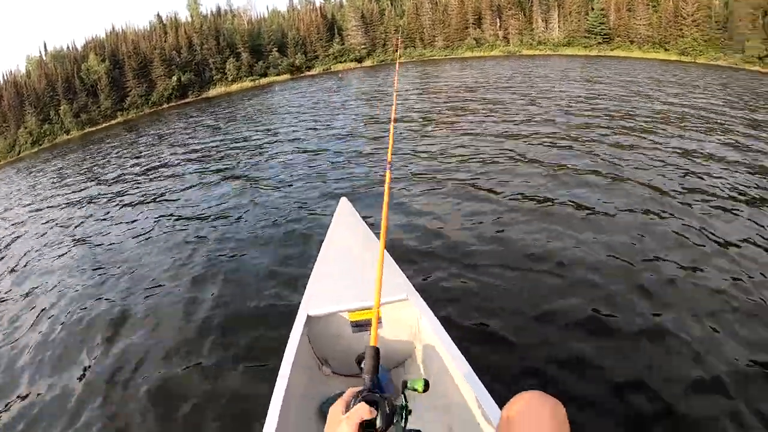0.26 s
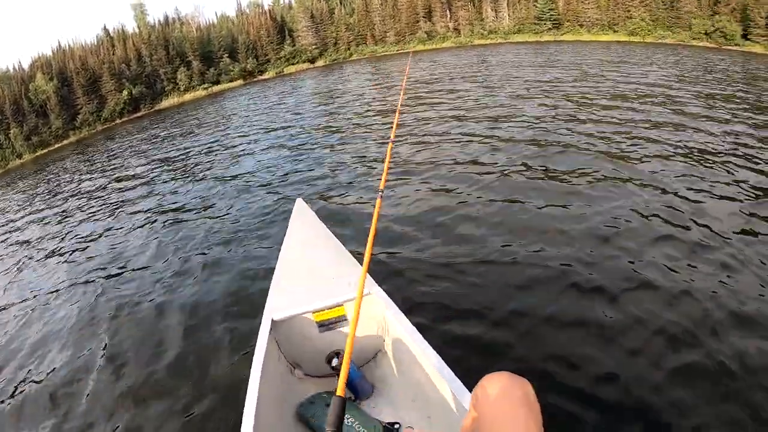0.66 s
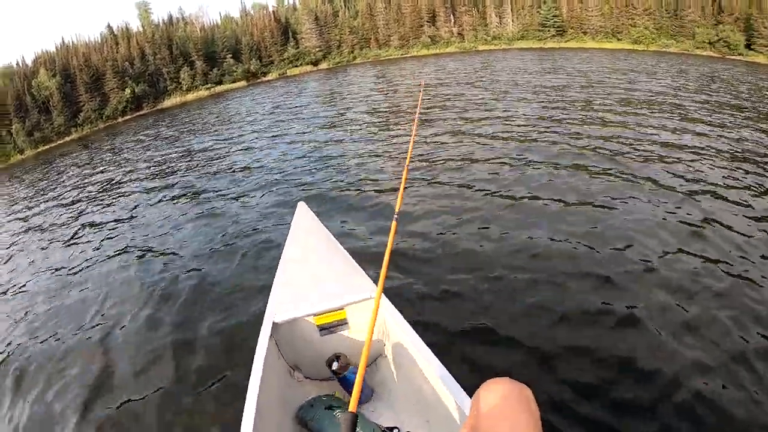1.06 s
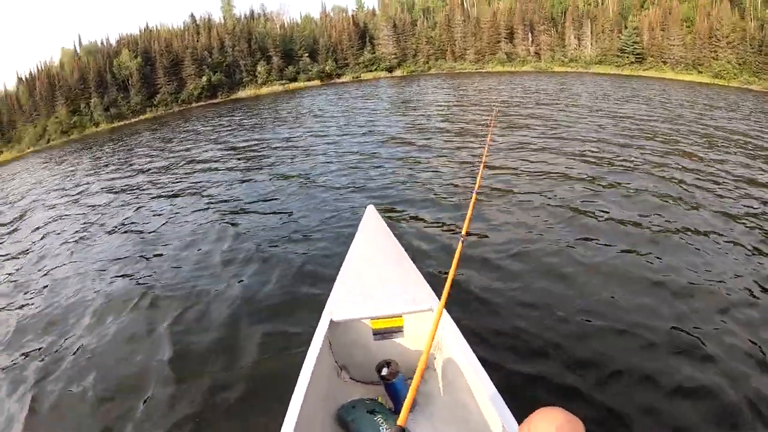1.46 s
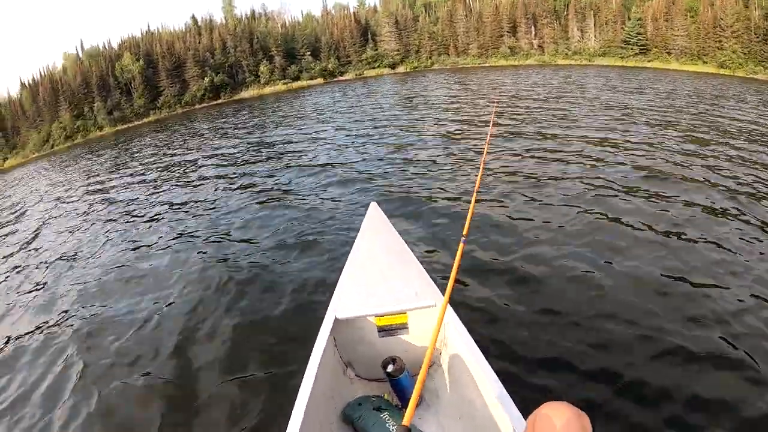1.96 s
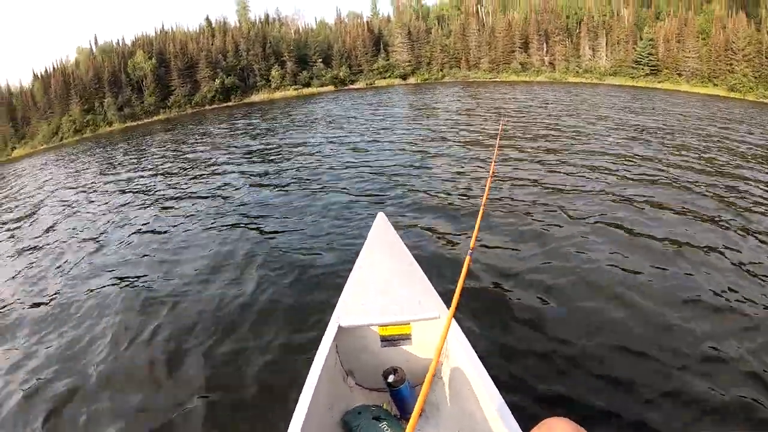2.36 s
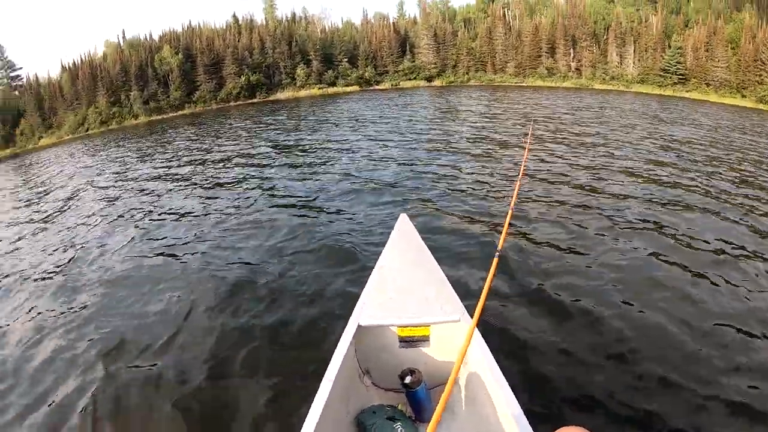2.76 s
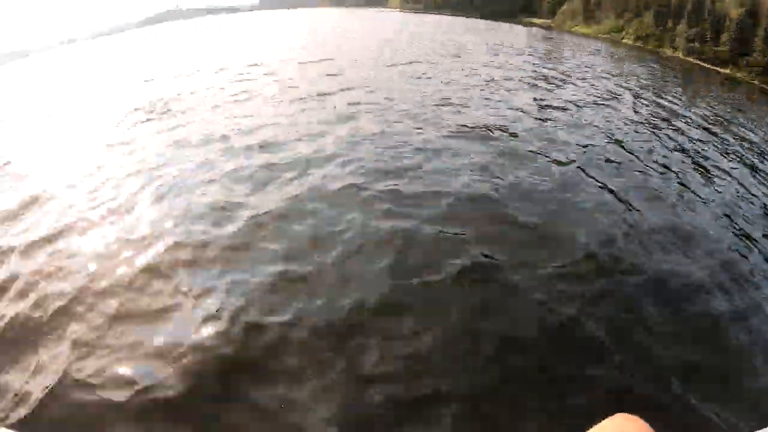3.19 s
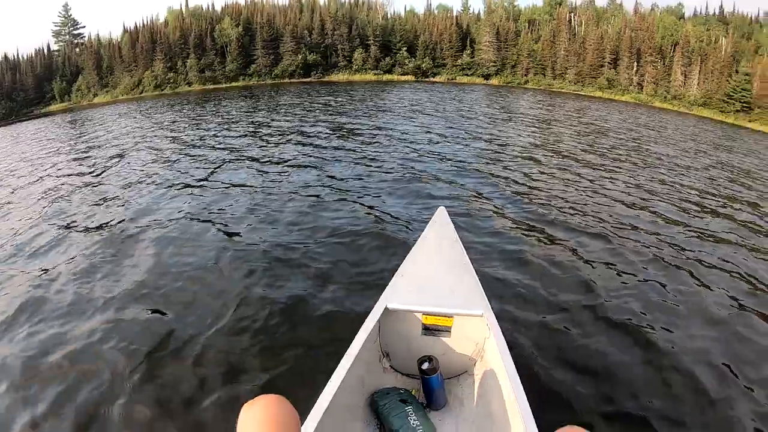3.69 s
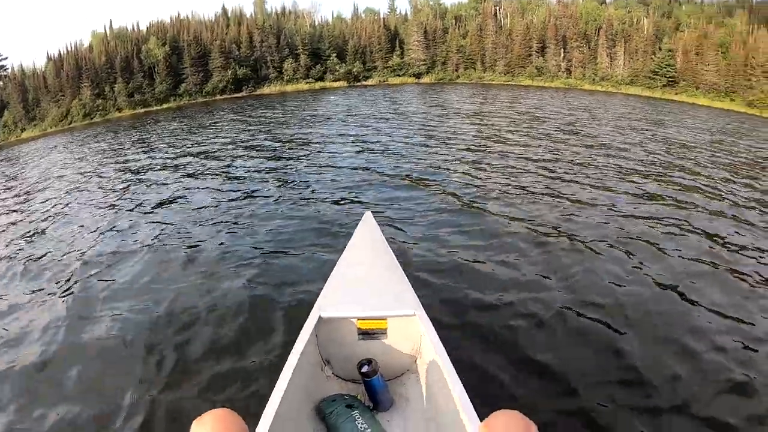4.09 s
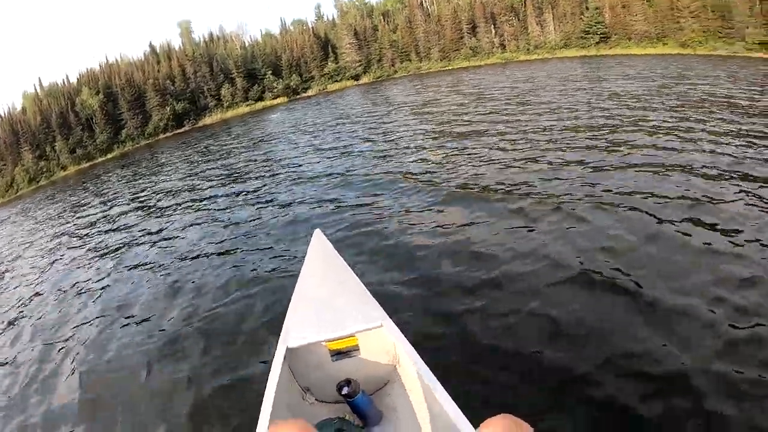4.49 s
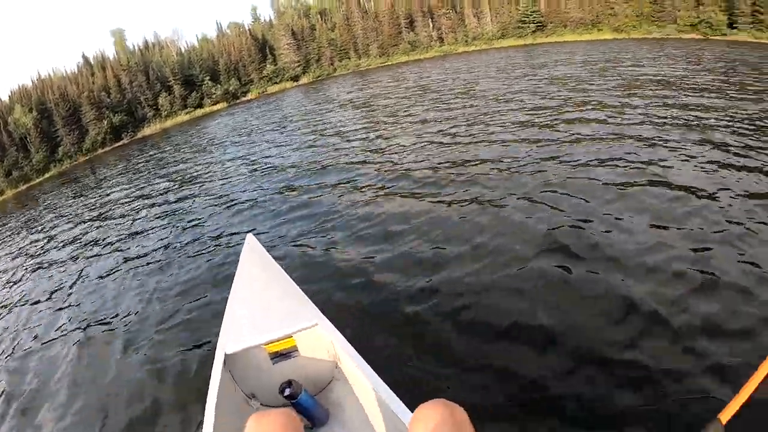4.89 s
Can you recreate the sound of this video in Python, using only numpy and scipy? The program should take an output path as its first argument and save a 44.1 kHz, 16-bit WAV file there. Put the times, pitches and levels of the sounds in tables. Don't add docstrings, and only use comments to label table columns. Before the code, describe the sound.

Wind rumbles and flutters softly on a small stereo camera microphone while wavelets lap a canoe, with tiny high drips and bubbles and light ticks of gear. At about 0.77 s a reel clutch snaps in, a bright, dry, very short metallic clack, by far the sharpest sound so far. Quiet lapping follows; near 1.5 s a small bird faintly sings a quick falling phrase on the left, and a crisp drop hits at 1.7. Around 2.6 s ticks and snaps lead into sloshing, deep gulps and plops on the left until about 3.1. A stronger gust pushes at 3.1; scuffs and a hard, short hull knock come at 3.4-3.5. From about 4 s a reel rattles grainily on the right, with a small rising squeak near 4.3 and short gear whines at 4.4, 4.7, 4.9 and 5.15. The bird repeats faintly near 4.75, and light knocks end it.

```python
import sys
import numpy as np
from scipy import signal
from scipy.fft import rfft, irfft
from scipy.io import wavfile
from scipy.ndimage import uniform_filter1d, map_coordinates

SR = 44100
rng = np.random.default_rng(int(sys.argv[2]) if len(sys.argv) > 2 else 0)


def transcribe(u):
    v = np.clip(np.atleast_2d(u).T, -1, 1)
    q = np.round(v * 32767).astype(np.int16)
    wavfile.write(sys.argv[1], SR, q)


def boost_factor(decibels):
    exponent = np.asarray(decibels, float) / 20
    return 10 ** exponent


N = 226798
T = np.arange(N) / SR
SIDES = np.array([[.5], [-.5]])

# [t/s, peak level/dB, share of low ring 0-1, build-up/s]
CLUTCH = [
    (.735, -33, 0.15, 0.0052),
    (.751, -25, 0.47, 0.004),
    (0.745, -21.5, 0.2, 0.0022),
    (0.7688, -16, 0.73, 0.0024),
    (0.772, -1.5, 0.17, 0.0019),
    (0.784, -17, 0.42, 0.00081),
    (0.791, -26.5, 0.6, 0.0043),
    (.797, -29, 0.5, 0.0045),
]
# [f/Hz, level/dB, time to fall 60 dB/s]
CLUTCH_LOW = [(600, -2.5, 0.014), (810, -5, .02), (1080, 1, 0.011), (1500, 8, 0.011), (1820, 2, 0.017),
              (2550, -9, 0.028)]
# [f/Hz, level/dB, time to fall 60 dB/s]
CLUTCH_HIGH = [(2600, -2, .009), (3085, 0, .011), (3630, 1, .01), (4500, -1, .008), (5400, 1, .008),
               (6290, -3, .007), (7000, -8, .007)]
# [start t/s, end t/s, fastest t/s, teeth per s, level/dB, slowing/(teeth per s) per s]
TURNS = [
    (3.72, 3.78, 3.747, 332, -47, 1900),
    (4.375, 4.49, 4.415, 422, -35.5, 2300),
    (4.65, 4.735, 4.683, 428, -33.5, 1700),
    (4.885, 4.985, 4.93, 410, -36, 3200),
    (5.11, 5.2, 5.16, 400, -40, 1900),
]
# [t/s, level/dB, time to fall 20 dB/s (negative: time to rise 20 dB/s, then a slow
PUSHES = [
    (4.19, -46.5, 1.7),
    (4.29, -40.5, -0.24),
    (4.44, -34, 0.03),
    (4.6, -37.5, -0.11),
    (4.7, -35.5, 0.03),
    (4.84, -42.5, -0.1),
    (4.94, -36.5, 0.04),
    (5.07, -42.5, 0.15),
]
# [f/Hz, level/dB]
HOUSING = [(600, -6.5), (1000, 2), (1400, 4), (1800, 5), (2300, 4.5), (2750, -4.5), (3400, -9), (5000, -18),
           (7000, -52)]
# [f/Hz, level/dB]
TOOTH = [(1000, -38), (1300, 0.5), (1650, 7), (2100, 1.5), (2550, -5.5), (2900, -42), (4000, -44)]
# [t/s, level/dB, time to fall 20 dB/s, spray level/dB, left-right level/dB]
SLOSH = [(2.4, -71, 0.06, 28.5, 8), (2.59, -49.5, 0.06, 18, 12), (2.705, -33.5, 0.0154, 3.5, 9),
         (2.765, -40.5, 0.1835, 5.5, 6.5), (2.89, -38, 0.08, 3, 5.5), (2.936, -37, 0.09, 1.5, 4),
         (3.03, -42, 0.23, 1.5, 8), (3.42, -47, 0.2, 2.5, -6.5), (3.48, -46.5, 0.19, -0.5, -3),
         (3.535, -45, 0.22, -2.5, -5.5), (3.745, -47, 0.14, 5, -20), (3.62, -50.5, 0.07, 11, -19),
         (3.83, -51.5, 0.3, -3.5, -14), (3.92, -54.5, 0.08, 6, -19)]
# [f/Hz, level per Hz/dB]
SLOSH_BODY = [(500, -109), (900, 5.5), (1900, 3.5), (3500, -4.5), (5000, -17.5), (7000, -65)]
# [f/Hz, level per Hz/dB]
BOOM = [(70, -45), (125, -11), (200, 5.5), (500, 4), (850, 5), (1300, -22)]
# [f/Hz, level per Hz/dB]
SPRAY = [(3500, -6.5), (5200, 5.5), (7000, -5), (9000, 6.5), (10600, 7.5), (12000, 5), (15500, -1),
         (16500, -69)]
# [f/Hz, level per Hz/dB]
FIZZ = [(3500, -5), (5200, 10.5), (7000, -7), (9000, 8), (10600, -9.5), (11600, -19), (15500, 3),
        (16500, -69)]
# [t/s, pitch f/Hz, level/dB]
GURGLE = [
    (2.64, 676, -42.5),
    (2.7, 960, -61),
    (2.8, 600, -44.5),
    (2.83, 493, -46),
    (2.87, 500, -55),
    (2.93, 950, -60),
    (2.97, 600, -48.5),
    (3.01, 360, -46),
    (3.07, 330, -74),
]
# [t/s, peak level/dB, ring f/Hz, left-right level/dB]
TICKS = [(0.068, -39.5, 2580, -1), (0.214, -40, 2170, -7), (0.281, -38, 2220, 12), (0.451, -37, 1420, -3),
         (0.458, -38.5, 3850, 1), (0.651, -43.5, 1570, -5), (0.717, -40, 9500, -6), (1.831, -43.5, 8800, 6),
         (1.9, -50, 4360, -3), (2.347, -43, 3400, -3), (2.358, -44, 8900, 24), (2.39, -43.5, 4430, -3),
         (2.43, -43.5, 4450, -6.5), (2.566, -41, 1870, -1.5), (2.583, -29, 4100, 1), (2.6, -27, 4220, -2),
         (2.638, -41, 4500, -5), (2.706, -22, 1770, -1), (3.194, -37, 2830, -3.5), (3.39, -27, 1970, -6.5),
         (3.44, -37, 5190, -29), (4.356, -37, 3600, 9), (2.577, -43, 9170, -6.5), (2.61, -40, 4030, 6),
         (2.755, -33, 3860, -3)]
# [t/s, peak level/dB, ring f/Hz, left-right level/dB]
DROPS = [(0.179, -38.5, 2680, 4), (0.268, -38, 3010, 0), (0.394, -35, 3130, 1.5), (0.53, -37.5, 1750, 5.5),
         (0.574, -49, 3300, -6.5), (0.669, -39.5, 3110, 4), (0.864, -41.5, 2900, 1.5),
         (1.274, -40, 2080, 1), (1.609, -39, 3180, -2), (1.683, -25, 2355, 7), (1.848, -37.5, 1920, -2),
         (1.961, -37, 2640, 1), (2.162, -39.5, 1990, -3), (2.258, -37.5, 2910, 1), (2.486, -40.5, 1800, 3),
         (3.328, -30, 894, -12), (3.41, -31.5, 2200, -5.5)]
# [t/s, peak level/dB, ring f/Hz]
PLOPS = [
    (2.9, -22, 920),
    (2.694, -21.5, 1200),
    (2.965, -27, 1100),
    (2.794, -23.5, 810),
    (2.879, -25, 976),
    (2.92, -22.5, 950),
    (2.868, -34, 730),
    (3.149, -31.5, 1300),
]
# [t/s, peak level/dB, ring f/Hz, time to fall 60 dB/s, left-right level/dB]
KNOCKS = [(3.346, -48.5, 506, 0.12, 0), (4.31, -36.5, 214, 0.13, 2.5), (0.064, -41, 243, 0.064, -1),
          (2.707, -24, 194, 0.018, -3.2), (3.523, -12, 600, 0.016, -7), (3.533, -30, 269, 0.041, 0.1),
          (4.085, -38, 166.7, 0.27, 0), (4.141, -43.5, 214, 0.25, 0), (4.192, -49, 249, 0.18, 6),
          (5.095, -28, 580.7, 0.021, -6), (5.125, -26, 574, 0.011, -6.5)]
# [t/s, pitch f/Hz, level/dB]
SQUEAK = [
    (4.245, 600, -54),
    (4.262, 680, -52),
    (4.28, 805, -55),
    (4.335, 880, -51),
    (4.36, 905, -64),
]
# [t/s, peak level/dB,
# ring f/Hz, left-right level/dB]
DRIPS_AND_THUDS = [(.011, -42.5, 790, 1), (2.643, -36, 1700, 4), (2.664, -37, 1500, 1), (2.683, -31.5, 2570, 6),
                   (2.735, -36, 1350, 11), (2.742, -37.5, 1850, 4.5), (2.771, -24, 940, 18), (2.776, -29, 2170, 4),
                   (2.794, -28, 637, 10), (2.798, -45, 1850, -1), (2.815, -28.5, 498, 4), (2.822, -35, 1710, 3),
                   (2.842, -39, 520, 7), (2.85, -39, 1890, 2), (2.858, -35, 480, 5), (2.885, -26.5, 2180, 4),
                   (2.89, -38, 500, 4), (2.908, -45, 1610, 6), (2.926, -35, 640, 9), (2.934, -29, 1860, 3),
                   (2.946, -30.5, 2430, 9), (2.949, -26, 865, 15), (2.978, -36, 3800, 2), (2.989, -30, 2060, 9),
                   (3, -30.5, 359, 4), (3.012, -31, 374, -2), (3.005, -31, 1030, 14), (3.028, -37.5, 1880, 10),
                   (3.061, -37, 3120, 14), (3.479, -39.5, 1870, -6), (3.497, -33, 600, -9), (3.53, -28, 1180, -6),
                   (3.535, -24, 177, 0), (3.546, -30, 150, 0), (4.08, -44, 566, -9), (4.608, -35, 600, -1),
                   (4.92, -40, 522, -8), (5.124, -32.5, 191, 0), (3.15, -34, 196, 3)]
# [t/s, peak level/dB, ring f/Hz, left-right level/dB]
DRIPS = [(0.148, -54, 2780, 2.5), (0.164, -43, 3020, 7), (0.243, -51, 2740, 2), (0.287, -52, 2360, 0.0),
         (0.322, -47, 2400, 5), (0.342, -41.5, 1960, 3), (0.38, -46, 2300, 4), (0.471, -50, 1410, 5),
         (0.547, -55, 3250, 3), (0.566, -43.5, 3200, 4), (0.614, -45.5, 2620, 6), (0.661, -44, 2600, 6),
         (0.691, -43.5, 2670, 11), (0.703, -56.5, 3060, 3.0), (0.821, -44, 1960, 1.5),
         (0.854, -49, 1510, 1.5), (0.895, -58, 1450, -7), (1.017, -52, 2310, 1.5), (1.06, -49, 1350, 2.5),
         (1.073, -51, 1950, -8.5), (1.163, -53, 1900, 0), (1.199, -49, 1770, -0.5), (1.226, -40.5, 2210, 6),
         (1.289, -45.5, 2280, 2), (1.296, -51, 1510, 7), (1.336, -59, 1480, -9.5), (1.415, -47, 2100, 0),
         (1.455, -47, 1850, -6), (1.482, -48, 1340, 5), (1.496, -47.5, 1400, -3), (1.798, -46, 2600, 6.5),
         (1.814, -47, 1520, -4), (1.919, -46, 3600, 1.5), (1.982, -50, 1880, -2), (2.013, -57, 2180, 2.5),
         (2.046, -53, 2070, -1.0), (2.089, -51, 1770, 3), (2.129, -50, 1520, 0.5), (2.189, -45, 2950, 2.5),
         (2.244, -48, 2780, 3), (2.286, -49, 2600, -1), (2.319, -49, 2120, 3), (2.429, -45, 4500, -1),
         (2.503, -43, 2610, 5)]
# [t/s, peak level/dB, centre f/Hz, left-right level/dB]
SNAPS = [(2.57, -41, 7000, 0), (2.58, -36, 11000, 0), (2.6, -33, 10000, -1.5), (2.618, -33.5, 3800, -2),
         (2.637, -37, 10000, 0), (2.686, -43, 9000, 1), (2.734, -43, 11500, 3), (2.744, -38, 2200, 0),
         (3.35, -44, 3200, -5), (3.39, -36, 9100, -5.5), (3.409, -41, 9500, -6.5), (3.474, -43, 9800, -6),
         (4.354, -34, 3000, 3), (2.771, -31, 1600, 8), (.651, -44, 2200, -4), (2.706, -30, 5000, 0),
         (.179, -43, 3000, 3), (4.068, -47, 6500, -8)]
# [delay/s, length/s, first f/Hz, last f/Hz, level/dB]
PHRASE = [
    (0, 0.095, 4800, 4170, -63),
    (0.092, 0.05, 3450, 2940, -50.5),
    (0.136, .026, 4100, 3720, -69),
    (.136, .016, 5400, 5100, -72),
]
# [t/s, stretch of time, settling time of pitch/s, level/dB]
SINGS = [
    (1.516, 1.0, 0.031, -2.5),
    (4.745, 1.28, 0.31, -4),
]
# [start t/s, length/s, pitch f/Hz, level/dB]
PIPS = [
    (4.637, .025, 3930, -65),
    (4.675, 0.023, 3960, -79),
    (4.711, 0.026, 3940, -64),
]
# [t/s, rumble level/dB, time to fall 20 dB/s (negative: time to rise 20 dB/s, then a fall about as
# fast; 0: silent), flutter over rumble/dB, left-right level/dB]
GUSTS = [(.03, -37, 0.42, -3, 0), (.33, -38.5, .5, -8.5, -2.5), (.61, -39, 0.37, -6, 21),
         (.72, -44.5, 0.5, -15, -8), (.95, -37, 0.12, -10, 10), (1.24, -43, 0.18, -15.5, 18),
         (1.5, -48.5, 0.03, -5, 14), (1.36, -31.5, 0.05, -7.5, 18), (1.7, -48, 1, -24.5, 6),
         (1.95, -42, 0.31, -10.5, 15), (2.37, -37, 0.53, -11.5, 3.5), (2.46, -47, 0, 0, 5),
         (2.98, -48, -0.2, -3, 6), (2.68, -42, 0.12, -10, 14), (2.9, -49.5, 0.6, -26, 16),
         (3.13, -28, 0.0842, 1, 8), (3.25, -32, 0.26, 0.5, -2), (3.35, -34.5, 0.12, -9, 10.5),
         (3.56, -37, 0.1, -7, 2), (3.77, -32.5, 0.13, -6.5, -8), (3.99, -34, 0.21, -3.5, -13),
         (4.17, -58.5, -3, -5, 10), (4.34, -36, 0.14, -3, -13), (4.58, -36, .4, -4.5, -9),
         (4.97, -32.5, 0.36, -11.5, 8), (5.13, -48.5, 1.4, 5, 8.5)]
# [f/Hz, level per Hz/dB]
RUMBLE = [(5, -25), (15, 3), (40, 4), (54, -1.5), (85, -54), (200, -103)]
# [f/Hz, level per Hz/dB]
FLUTTER = [(40, -6), (70, 2), (110, -5), (170, -16), (260, -30), (500, -57.5)]
# [t/s, level/dB]
LAPPING = [(0.0, -61), (0.73, -59), (1.31, -60), (1.8, -57.5), (2.45, -57), (2.6, -60), (3.2, -60),
           (3.63, -63), (3.67, -72), (3.72, -64), (3.93, -65), (4.0, -76), (4.07, -63), (5.14, -60)]
# [f/Hz, level per Hz/dB]
WASH = [(120, -51), (200, 3), (347, -8.5), (579, -10.5), (722, -3.5), (968, -6), (1480, -3.5), (3250, -6.5),
        (6400, -23), (8900, -35.5), (16000, -49)]
# [f/Hz, level per Hz/dB]
AIR = [(3000, -48), (8000, 0), (11000, -2), (15500, -6.5)]
# [f/Hz, level/dB]
MICROPHONE = [(20, 0), (9500, 3), (11000, -10.5), (13000, -14.5), (15400, -20), (16300, -82)]


def clutch():
    out, t = np.zeros(N), np.arange(3000) / SR
    for s, db, low, build in CLUTCH:
        crack = ring(ring(rng.standard_normal(len(t)), 3300, 4700), 3000, 5800)
        crack *= 2.66 * boost_factor(-60 * t / 0.013)
        swell = np.sin(np.pi / 2 * np.minimum(t / build, 1)) ** 2
        low_ring = 2.0 * struck(CLUTCH_LOW, t, 0.062)
        high_ring = struck(CLUTCH_HIGH, t, 0.059)
        add(out, s, boost_factor(db - 7.5) * swell * (low * low_ring + (1 - low) * (high_ring + crack)))
    return place(out, -6.0, ahead=-0.1)


def reel():
    start_s, level_db = 4.015, -50
    gate = np.clip((T - start_s) / 0.089, 0, 1)
    push_db, = surges(PUSHES, rise=3.73)
    load_db = 10 * np.log10(1 + boost_factor(2 * (push_db - level_db)))
    whine, turning = gear_whine()
    grit = lumpy(95, 1.0)
    rattle = gate * boost_factor(level_db + load_db - 6 * turning) * coloured(grit, HOUSING)
    boom = boost_factor(-54.5 + 0.53 * load_db) * coloured(lumpy(35, 1.6), BOOM)
    fizz = coloured(ring(grit, 7830, 2400) + 0.24 * grit, FIZZ)
    fizz *= boost_factor(-58.5 + 0.55 * load_db - 7.5 * (T - start_s))
    return place(gate * patchy(rattle + boom + fizz, 1.6) + whine, -11.5)


def gear_whine():
    turn = np.searchsorted([row[1] + .01 for row in TURNS], T)
    start, end, fastest, top, db, sag = np.transpose(TURNS)[:, turn]
    turning = np.clip(np.minimum(T - start, end - T) / .03, 0, 1)
    round_s = .012
    per_s = np.maximum(top - sag * (np.hypot(T - fastest, round_s) - round_s), 250)
    from_middle = np.minimum(abs(2 * T - start - end) / (end - start), 1)
    db = db - 9 * from_middle ** 1.5
    wobble = 1 + .017 * drift(N, 150)
    pairs = np.cumsum(uniform_filter1d(per_s, size=500) * wobble) / SR / 2
    teeth = np.zeros(N)
    for k in range(4, 16):
        teeth += np.cos(2 * np.pi * k * pairs) * (.3 if k % 2 else 1)
    teeth *= boost_factor(2 * drift(N, 200))
    return np.sqrt(turning) * boost_factor(db + 3) * coloured(teeth, TOOTH), turning


def slosh():
    db, spray_db, pan_db = surges(SLOSH, rise=0.73)
    grit = lumpy(90, 1.4)
    body = boost_factor(-4) * coloured(grit, SLOSH_BODY)
    boom = boost_factor(-6 - 1.4 * spray_db) * coloured(lumpy(50, 0.95), BOOM)
    spray = boost_factor(-13 + spray_db) * coloured(grit, SPRAY)
    bubbling = boost_factor(-6 - .45 * spray_db) * bubbles(400, 502, 3190, 7.7, 5.9)[0]
    return place(boost_factor(db) * patchy(body + boom + spray + bubbling, 1.3), pan_db) + gurgle()


def gurgle():
    gate, hz, db = columns(GURGLE)
    kicks = rng.standard_normal(N) * (rng.random(N) < 320 / SR)
    turn = np.exp(2j * np.pi * np.cumsum(hz) / SR)
    r = np.exp(-np.pi * 190 / SR)
    pocket = (turn * signal.lfilter([1], [1, -2 * r, r * r], kicks / turn)).real
    return place(gate * boost_factor(db) * evened(pocket), 2.8)


def drops_and_ticks():
    out, t = np.zeros((2, N)), np.arange(4000) / SR
    onset = 1 - np.exp(-t / 0.00025)
    hits = [(*row, 0.064) for row in DROPS]
    hits += [(*row, 0.99) for row in TICKS]
    hits += [(*row, 36, 0.064) for row in PLOPS]
    for s, db, hz, pan_db, sharpness in hits:
        noise = rng.standard_normal(len(t))
        tone = 0.32 * np.sin(2 * np.pi * hz * (t + 4 * t ** 2))
        splash = 0.27 * evened(ring(ring(noise, hz, 0.94 * hz), hz, 0.94 * hz))
        drop = (tone + splash) * boost_factor(-60 * t / 0.037)
        crack = ring(ring(np.diff(noise, prepend=0), 2900, 6600), 3000, 9600)
        crack *= boost_factor(-60 * t / 0.011)
        add(out, s, place(boost_factor(db) * onset * (drop + sharpness * crack), pan_db))
    return out


def knocks():
    out, t = np.zeros((2, N)), np.arange(4000) / SR
    for s, db, hz, t60, pan_db in KNOCKS:
        onset = (1 - np.exp(-t * hz / 0.31)) ** 2
        modes = [(hz, .1, t60), (1.42 * hz, -10, t60), (1.97 * hz, -15, t60)]
        add(out, s, place(boost_factor(db + 3) * onset * struck(modes, t), pan_db))
    return out


def squeak():
    out = np.zeros((2, N))
    s, note = whistle(SQUEAK, -29)
    shiver_db = 3.5 * np.clip(drift(len(note), 300), -2, 1)
    add(out, s, place(note * boost_factor(shiver_db), -9.5))
    return out


def drips():
    out, t = np.zeros((2, N)), np.arange(3000) / SR
    for s, db, hz, pan_db in DRIPS + [(s, db - 1.5, *rest) for s, db, *rest in DRIPS_AND_THUDS]:
        turns = hz * t
        fade = boost_factor(-60 * t / (.011 + 12 / hz))
        onset = 1 - np.exp(-turns / 0.83)
        tone = np.sin(2 * np.pi * (turns + .004 * turns ** 2))
        add(out, s, place(boost_factor(db + 1) * fade * onset * tone, pan_db))
    return out


def snaps():
    out, t = np.zeros((2, N)), np.arange(1000) / SR
    for s, db, hz, pan_db in SNAPS:
        burst = evened(ring(rng.standard_normal(len(t)), hz, 1.3 * hz))
        onset = 1 - np.exp(-t / 0.00051)
        add(out, s, place(boost_factor(db - 60 * t / 0.011) * onset * burst, pan_db))
    return out


def bird():
    out, u = np.zeros((2, N)), np.linspace(0, 1, num=9)
    for s, stretch, settle, sing_db in SINGS:
        for delay, length, first_hz, last_hz, db in PHRASE:
            end = np.exp(-length / settle)
            hz = last_hz + (first_hz - last_hz) * (np.exp(-u * length / settle) - end) / (1 - end)
            times = s + stretch * (delay + u * length)
            swell_db = -17 * ((u - .55) / .6) ** 2
            at, note = whistle(np.c_[times, hz, db + sing_db + swell_db], -28.5)
            flutter_db = 1.8 * np.sin(2 * np.pi * 60 * np.arange(len(note)) / SR)
            add(out, at, place(note * boost_factor(flutter_db), 9.8))
    for s, length, hz, db in PIPS:
        rows = [(s, hz, db - 6), (s + length / 2, hz, db), (s + length, hz, db - 6)]
        add(out, s, place(whistle(rows, -48)[1], 0))
    return out


def hull(x):
    t = np.arange(3000) / SR
    sparse = rng.random((2, len(t))) < .05
    taps = rng.standard_normal((2, len(t))) * sparse * boost_factor(-60 * t / 0.077) * (t > .001)
    return signal.oaconvolve(x, taps / np.linalg.norm(taps[0]), axes=1)[:, :N]


def wind():
    db, flutter_db, pan_db = surges(GUSTS, rise=0.92)
    ports = []
    for _ in range(2):
        rumble = steadied(coloured(lumpy(9, 3), RUMBLE))
        flutter = steadied(coloured(lumpy(14, 4), FLUTTER))
        ports.append(rumble + boost_factor(flutter_db) * flutter)
    return np.array(ports) * boost_factor(db + 5 + SIDES * pan_db) / pan_loudness(pan_db)


def lake():
    _, db = columns(LAPPING)
    shared, left, right = (coloured(lumpy(39, 3.5), WASH) for _ in range(3))
    wash = 0.54 * shared + 0.83 * np.array([left, right])
    plinks = boost_factor(-8) * bubbles(300, 1350, 4500, 11, 3.3)
    return boost_factor(db) * patchy(boost_factor(-1.0) * wash + plinks, 1.87) * boost_factor(1.6 * SIDES)


def bubbles(per_s, low_hz, high_hz, cycles, spread_db):
    out = np.zeros((2, N))
    for hz in np.geomspace(low_hz, high_hz, num=16):
        u = np.arange(int(3 * cycles * SR / hz)) * hz / SR / cycles
        tone = np.sin(2 * np.pi * cycles * (u + 0.154 * u ** 2))
        tone *= (1 - np.exp(-12 * u)) * np.exp(-2.3 * u)
        size = boost_factor(spread_db * np.minimum(rng.exponential(1, N), 4))
        size *= rng.random(N) < per_s / 16 / SR
        side = rng.uniform(-1, 1)
        sound = signal.oaconvolve(size, tone)[:N]
        out[0] += np.roll(sound, round(-4 * side)) * boost_factor(4.0 * side)
        out[1] += sound * boost_factor(-2.5 * side)
    return evened(out)


def air():
    db = -74.5 + 0.41 * (columns(LAPPING)[1] + 60)
    return boost_factor(db) * np.array([coloured(lumpy(35.4, 3.0), AIR) for _ in range(2)])


def evened(x):
    return x / np.sqrt(np.mean(x ** 2) + 1e-20)


def drift(length, smooth):
    return evened(uniform_filter1d(rng.standard_normal(length), size=smooth))


def add(mix, s, sound):
    part = mix[..., round(s * SR):][..., :sound.shape[-1]]
    part += sound[..., :part.shape[-1]]


def curve(length, table):
    f, db = np.transpose(table)
    hz = np.fft.rfftfreq(length, 1 / SR)
    return boost_factor(np.interp(np.log(hz + 1), np.log(f), db))


def coloured(x, spectrum):
    return evened(irfft(rfft(x) * curve(len(x), spectrum), len(x)))


def lumpy(lump_hz, lump_db):
    kicks = rng.standard_normal(N) ** 3
    r = np.exp(-2 * np.pi * lump_hz / SR)
    level = signal.lfilter([1], [1, -r], uniform_filter1d(kicks, size=40))
    return rng.standard_normal(N) * boost_factor(lump_db * np.clip(evened(level), -3, 3))


def steadied(x):
    power = uniform_filter1d(uniform_filter1d(x ** 2, size=4000), size=4000)
    return evened(x / (power + .02) ** .33)


def patchy(x, patch_db):
    z = signal.stft(x, nperseg=512)[2]
    patches = rng.standard_normal(z.shape[:-3:-1])
    for axis in (0, 1):
        patches = uniform_filter1d(patches, size=9, axis=axis)
    return signal.istft(z * boost_factor(patch_db * evened(patches).T), nperseg=512)[1][..., :N]


def ring(x, hz, width):
    return signal.lfilter(*signal.iirpeak(hz, hz / width, SR), x)


def struck(modes, t, spread=0):
    total = np.zeros(len(t))
    for (hz, db, t60), u in zip(modes, rng.random(len(modes))):
        shifted_hz = hz * (1 + spread * np.sin(9 * u))
        total += boost_factor(db - 60 * t / t60) * np.sin(2 * np.pi * (shifted_hz * t + u))
    return total * (1 - np.exp(-t / 0.000063))


def whistle(rows, second_db):
    s, hz, db = np.transpose(rows)
    t = np.arange(s[0], s[-1], 1 / SR)
    turn = 2 * np.pi * np.cumsum(np.interp(t, s, hz)) / SR
    tone = np.sin(turn) + boost_factor(second_db) * np.sin(2 * turn)
    return s[0], 3.65 * boost_factor(np.interp(t, s, db)) * tone * signal.windows.tukey(len(t), .25)


def columns(rows):
    s, *cols = np.transpose(rows)
    since_start = T - s[0] + (s[0] < .01)
    until_end = s[-1] - T + (s[-1] > 5.1)
    gate = np.clip(np.minimum(since_start, until_end) / .03, 0, 1)
    return gate, *(np.interp(T, s, c) for c in cols)


def surges(rows, rise):
    s, db, fall, *cols = np.transpose(rows)[:, :, None]
    coarse = T[::64]
    late = (coarse - s) / fall
    drop_db = 20 * np.where(late > 0, late, -late / rise)
    power = boost_factor(2 * (db - drop_db)) + 1e-30
    total = power.sum(0)
    values = [10 * np.log10(total)] + [(power * c).sum(0) / total for c in cols]
    return [np.interp(T, coarse, v) for v in values]


def pan_loudness(pan_db):
    return np.sqrt(np.cosh(pan_db * np.log(10) / 20))


def place(x, pan_db, lag_per_db=4.5, outside=0.7, ahead=1):
    pan_db = pan_db * np.ones(len(x))
    mids = ring(x, 1740, 2100)
    shaded = mids * boost_factor(SIDES * pan_db) + (x - mids) * boost_factor(outside * SIDES * pan_db)
    shaded /= pan_loudness(pan_db)
    lag = np.clip(lag_per_db * (-pan_db - 4.5), -2.2, 12.5)
    lag *= np.where(pan_db > -8, ahead, 1)
    arrival = np.arange(len(x)) - lag * SIDES
    return np.array([map_coordinates(c, [a], order=3) for c, a in zip(shaded, arrival)])


def scene():
    near = clutch() + reel() + slosh() + drops_and_ticks() + knocks() + squeak() + bird()
    echoes = boost_factor(-14) * hull(near)
    return near + echoes + drips() + snaps() + wind() + lake() + air()


def top_cut(x):
    return signal.sosfilt(signal.butter(12, 15900, fs=SR, output="sos"), x)


def record(dry):
    heard = irfft(rfft(dry) * curve(N, MICROPHONE), N)
    heard = .7 * np.tanh(heard / .7)
    return top_cut(heard)


dry = scene()
out = record(dry)
transcribe(out)
```